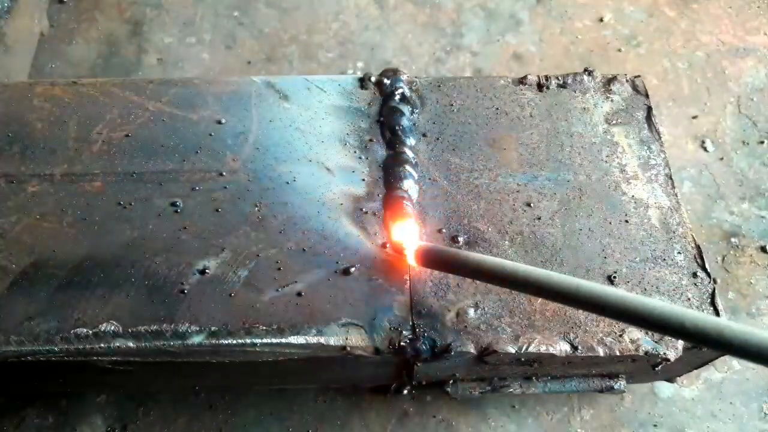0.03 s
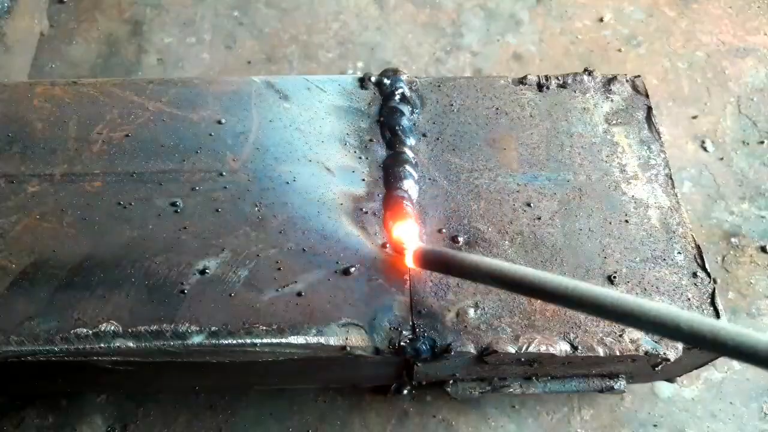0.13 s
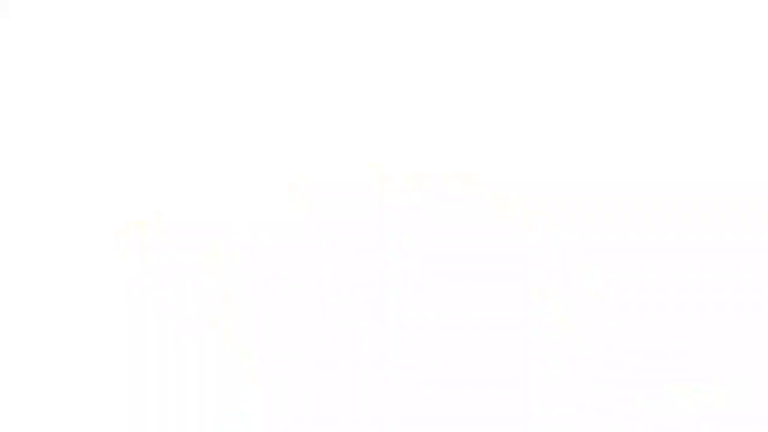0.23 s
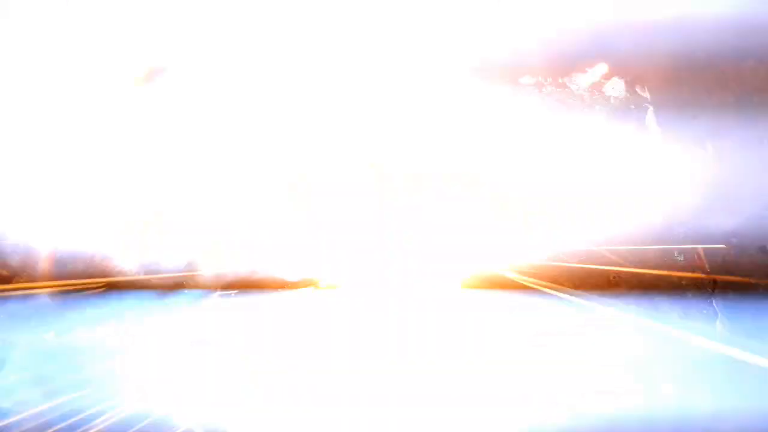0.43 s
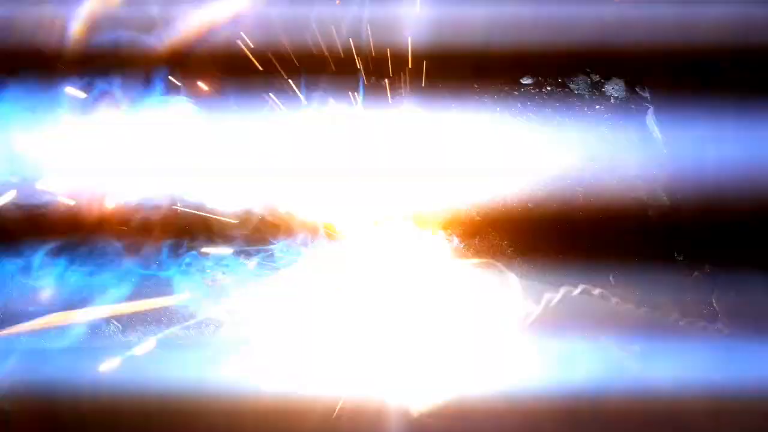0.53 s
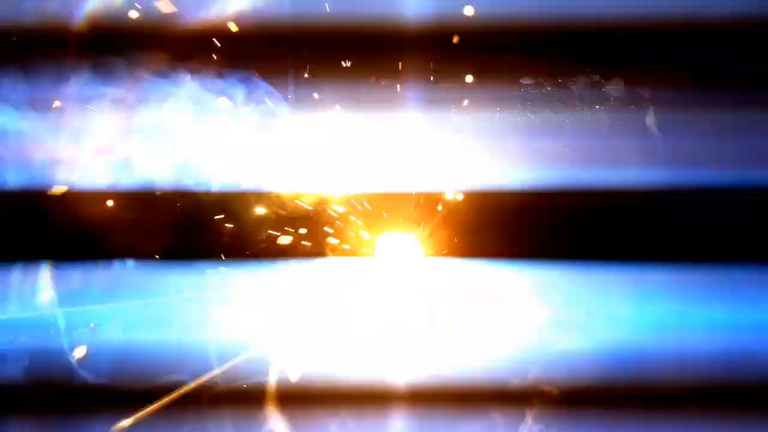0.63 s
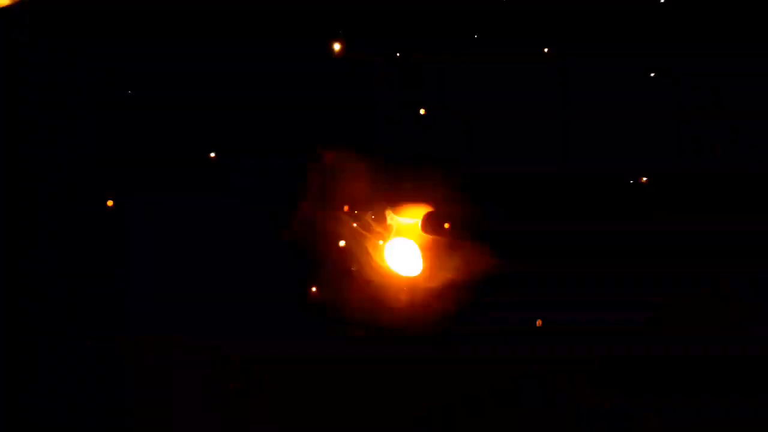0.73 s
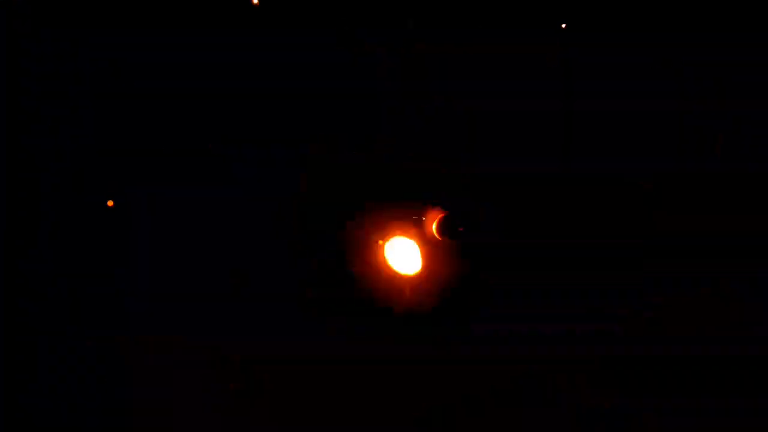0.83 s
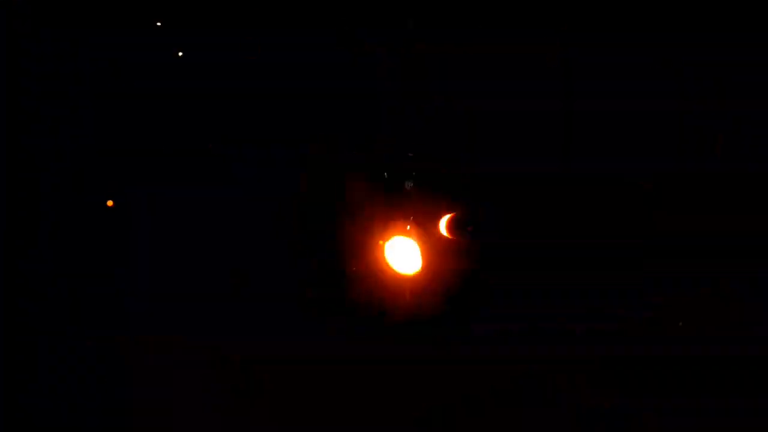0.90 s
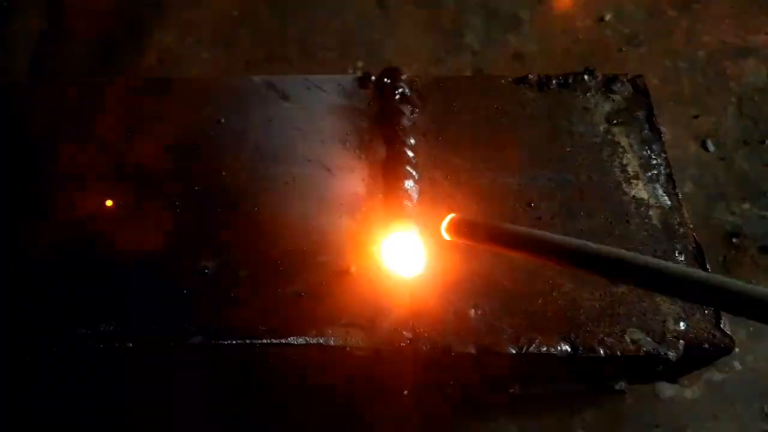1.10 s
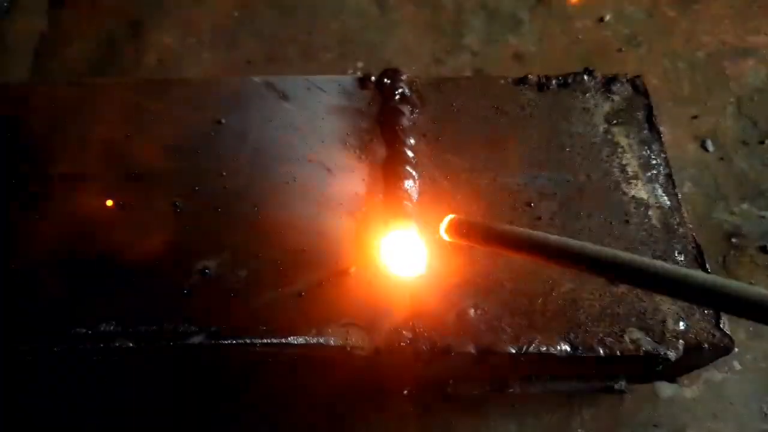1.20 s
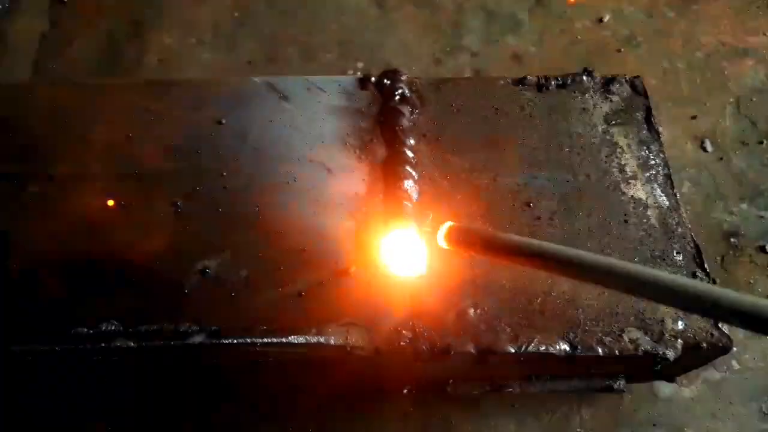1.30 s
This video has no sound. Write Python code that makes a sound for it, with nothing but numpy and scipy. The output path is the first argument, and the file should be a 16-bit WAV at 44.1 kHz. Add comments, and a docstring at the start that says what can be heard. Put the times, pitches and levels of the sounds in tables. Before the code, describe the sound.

A short, harsh crackle of arc welding on steel, followed by a few faint ticks.

```python
"""A half-second tack weld with a stick electrode on a steel section in a workshop.
First low room noise, hum, a dull rumble, a wavering tone and a faint far chirp. At 0.22 s the mains-fed
arc strikes, sizzling in pulses, twice per cycle; sparks burst and the steel rings. Drops of metal short
the arc; it relights each time with a crack and a puff of air. Drawn out with a flutter, it dies at
0.78 s. Spatter ticks on the steel, the cooling weld fizzes, and the chirp comes once more."""
import sys
import numpy as np
from scipy import signal
from scipy.fft import rfft, irfft, next_fast_len
from scipy.io import wavfile
from scipy.ndimage import uniform_filter1d

SR = 44100
rng = np.random.default_rng(int(sys.argv[2]) if len(sys.argv) > 2 else 0)


def wav_record(signal):
    """Record a signal, one row per channel, as 16-bit PCM in the file named by sys.argv[1]."""
    frames = np.transpose(np.atleast_2d(signal))
    bounded = np.clip(frames, -1, 1)
    # unit amplitude maps onto the largest positive 16-bit level
    quanta = np.round(bounded * 32767).astype(np.int16)
    wavfile.write(sys.argv[1], SR, quanta)


N = 59535
TIME = np.arange(N) / SR

# spark bursts: start_s, crack_db, spray_db, spray_ms
SPARKS = [(0.2387, -7, -12, 1.3), (0.2483, -21.5, -15.5, 1.1), (0.2708, -10.5, -33.5, .6),
          (0.3063, -8, -22, 2.2), (0.3111, -13.5, -19, 0.97), (0.3306, -28.5, -17.5, 0.42),
          (0.402, -16, -29.5, 0.43), (0.4256, -21.5, -27.5, 1.0), (0.4277, -14, -14, .8),
          (.4322, -12.5, -38, .5), (0.5003, -6.5, -42.5, .5), (0.5549, -13.5, -39, 0.46),
          (0.564, -4, -21, 1.2), (0.5836, -4.5, -20.5, 0.96), (0.6171, -9.5, -23.5, 0.49),
          (0.646, -32, -40, 0.42), (.7040, -8, -25, .5), (0.733, -10.5, -18, 1.05)]
# relights after a short: start_s, crack_db, spray_db, spray_ms, puff_db, puff_ms, short_ms
POPS = [(0.2578, -27.5, -24.5, 1.6, -19, 0.26, .4), (0.2762, -22.5, -17.5, 2.6, -11.5, 0.091, 0.65),
        (0.2961, -15.5, -23, 4, -19, .15, 0.27), (0.3415, -6, -25, .6, 1, 0.62, 11.3),
        (.3622, -2.5, -12.5, 1.8, -11.5, 0.1, 14), (0.4115, -2, -11, 2.8, -3, 0.43, 7.5),
        (0.4503, -8.5, -10, 1.9, -7.5, .4, 4), (.4801, 4, -26, 0.47, -6.5, 0.22, 8),
        (0.5101, -9.5, -14.5, 3.6, -11, 0.13, 9.1), (0.534, 2.5, -11.5, 3.1, -15.5, 0.65, 6.4),
        (0.5923, -2, -14, 3.3, -24.5, 0.41, 1.6), (0.6548, -5.5, -20, 0.41, -14.5, 0.39, 5.9),
        (0.7085, -8, -23, .6, -1, 0.42, 4)]


def from_db(db):
    """Decibels to gain."""
    return 10 ** (np.asarray(db) / 20)


def rms_one(x):
    """Scale to unit power."""
    return x / np.sqrt(np.mean(x ** 2) + 1e-20)


def level(rows):
    """Gain along a (time_s, level_db) curve, silent outside it."""
    time_s, level_db = np.transpose(rows)
    return from_db(np.interp(TIME, time_s, level_db, left=-140, right=-140))


def colour(x, points):
    """Minimum-phase filter through (freq_hz, gain_db) points."""
    size = 2 * next_fast_len(N)
    freq_hz, gain_db = np.transpose(points)
    grid_hz = np.maximum(np.arange(size // 2 + 1) * SR / size, 1)
    gain = from_db(np.interp(np.log(grid_hz), np.log(freq_hz), gain_db))
    cepstrum = irfft(np.log(gain))
    cepstrum[1:size // 2] *= 2
    cepstrum[size // 2 + 1:] = 0
    return irfft(rfft(x, size) * np.exp(rfft(cepstrum)))[:N]


def high_pass(x, hz):
    """Second-order high-pass."""
    return signal.sosfilt(signal.butter(2, hz, "high", fs=SR, output="sos"), x)


def drift(rate_hz):
    """Smooth random wander, spread about 1."""
    return np.interp(TIME * rate_hz, np.arange(N), rng.standard_normal(N))


def sine(pitch_hz):
    """Unit-power tone along a pitch curve."""
    return np.sqrt(2) * np.sin(2 * np.pi * np.cumsum(pitch_hz) / SR)


def decay(start_s, decay_s):
    """Sudden start, exponential fall."""
    return (TIME >= start_s) * np.exp(-np.maximum(TIME - start_s, 0) / decay_s)


def grains(per_s, spread_db):
    """Random clicks of uneven size, unit power."""
    sizes = from_db(spread_db * np.minimum(rng.exponential(1, N), 3))
    signs = rng.choice([-1, 1], N)
    return rms_one(sizes * signs * (rng.random(N) < per_s / SR))


def ring(x, modes):
    """Damped modes driven by x, alternating in sign."""
    out = 0
    for k, (pitch_hz, gain_db, t60_s) in enumerate(modes):
        radius, angle = np.exp(-np.log(1000) / (t60_s * SR)), 2 * np.pi * pitch_hz / SR
        mode = signal.lfilter([0, np.sin(angle)], [1, -2 * radius * np.cos(angle), radius ** 2], x + 1e-18)
        out += (-1) ** k * from_db(gain_db) * mode
    return out


def reflections(x, delay_s, decay_s):
    """Dense dying cloud of echoes, unit energy."""
    cloud = rng.standard_normal(N) * decay(delay_s, decay_s)
    return signal.fftconvolve(x, cloud / np.sqrt(np.sum(cloud ** 2)))[:N]


def workshop():
    """Low room noise, dipping during the weld, a faint hum and two faint higher tones."""
    # noise envelope: time_s, level_db
    envelope = [(0, -50), (.12, -51), (.2, -48.5), (.3, -63), (.8, -54.5), (.92, -54.5), (1.08, -55),
                (1.2, -57), (1.35, -60)]
    # noise spectrum: freq_hz, gain_db
    spectrum = [(25, -22.5), (52, 1), (105, 2), (240, -7.5), (390, -5), (600, -10.5), (950, -10),
                (1400, -18.5), (1800, -14), (2700, -20.5), (3900, -21.5), (5500, -35), (7600, -25.5),
                (8900, -42.5), (10100, -24), (12000, -45), (15500, -48)]
    # low hum and two faint higher tones: pitch_hz, level_db
    partials = [(53.8, -67), (317.6, -70.5), (414.5, -71.5)]
    noise = rms_one(colour(rng.standard_normal(N), spectrum))
    hum = sum(from_db(db) * sine(hz + 2 * drift(19.95)) for hz, db in partials)
    return noise * level(envelope) + hum


def wavering_tone():
    """A low tone comes and goes before the strike."""
    # tone envelope: time_s, level_db
    envelope = [(0, -50), (.03, -57.5), (.05, -76), (.1, -69), (.125, -45), (.155, -60), (.195, -41.5),
                (.23, -58), (.26, -70)]
    pitch_hz, waver_hz = 403.4, 8
    return level(envelope) * sine(pitch_hz + waver_hz * drift(40))


def rumble():
    """Dull rumble, fading as the arc strikes."""
    # rumble envelope: time_s, level_db
    envelope = [(0, -51.5), (.07, -46.5), (.14, -46.5), (.21, -49.5), (.3, -60)]
    # rumble spectrum: freq_hz, gain_db
    spectrum = [(30, -9), (100, 3), (260, -8.5), (450, -7), (800, -13), (1300, -20.5), (3000, -39.5),
                (15000, -69)]
    return level(envelope) * rms_one(colour(rng.standard_normal(N), spectrum))


def chirps():
    """Two faint, far, falling whistles."""
    # whistles: start_s, level_db
    whistles = [(0.117, -67), (1.178, -69.5)]
    length_s, from_hz, to_hz = .032, 3750, 2950
    out = 0
    for start_s, level_db in whistles:
        progress = np.clip((TIME - start_s) / length_s, 0, 1)
        out += from_db(level_db) * np.sin(np.pi * progress) * sine(from_hz + (to_hz - from_hz) * progress)
    return out


def arc_gain():
    """The arc pulses a little unevenly with the current and drops during each short."""
    pulse_hz, depth_db, scatter_db, short_db = 99.5, 4.2, .6, -31
    peak_s = .2285 + .0007 * drift(pulse_hz)
    pulse = np.cos(2 * np.pi * pulse_hz * (TIME - peak_s))
    gain_db = depth_db * (pulse - .5) + scatter_db * drift(pulse_hz)
    for relight_s, *_, short_ms in POPS:
        gain_db += short_db * ((TIME > relight_s - short_ms / 1000) & (TIME < relight_s))
    return uniform_filter1d(from_db(gain_db), size=40)


def sizzle(burn):
    """Hiss and fine crackle of the burning arc."""
    # arc envelope: time_s, gain_db
    envelope = [(.222, -32), (.227, -30.5), (.24, -27.5), (.275, -31.5), (.32, -31), (.37, -25.5),
                (.43, -29.5), (.49, -26.5), (.55, -34.5), (.61, -31), (.67, -33), (.72, -35.5),
                (.742, -28.5), (.755, -43), (.78, -49)]
    # sizzle spectrum: freq_hz, gain_db
    spectrum = [(100, -22), (380, 0.5), (680, -7), (950, 4), (1150, -4.5), (1500, -10.5), (1830, -2),
                (2600, -4), (4000, 0.5), (5800, -6), (7600, 0), (9100, -7.5), (11000, -2), (15500, -13)]
    fry = rng.standard_normal(N) + from_db(-2.5) * grains(per_s=1100, spread_db=7)
    return colour(fry * level(envelope) * burn, spectrum) * from_db(3)


def flame(burn):
    """Low flutter of the hot gas."""
    # flutter envelope: time_s, gain_db
    envelope = [(.222, -49), (.255, -43), (.28, -38.5), (.32, -36.5), (.38, -38), (.46, -31), (.55, -45),
                (.65, -43.5), (.72, -40.5), (.775, -32.5), (.781, -54)]
    # flutter spectrum: freq_hz, gain_db
    spectrum = [(30, -17.5), (70, 0), (115, 8), (200, -5.5), (380, 5.5), (650, -7.5), (980, -2.5),
                (1500, -13), (4000, -21.5), (15000, -60.5)]
    return rms_one(colour(rng.standard_normal(N), spectrum)) * level(envelope) * np.sqrt(burn)


def steel(arc):
    """The steel section rings under the arc."""
    # section modes: pitch_hz, gain_db, t60_s
    modes = [(362, -57, 0.13), (521.5, -56.5, 0.31), (586, -57, .25), (918, -50, 0.15), (1276, -58.5, 2),
             (1642, -60.5, 1.2), (1815, -36.5, 0.12), (1956, -45, .12), (2334, -46.5, .1),
             (3103, -44.5, 0.079), (3500, -53, 0.043), (3630, -39.5, .08), (8050, -42, .08),
             (7600, -39.5, .05)]
    # further modes at the same two pitches, fainter and dying sooner: pitch_hz, gain_db, t60_s
    extra_modes = [(1276, -63, 1.1), (1642, -66, 1.0)]
    return from_db(-12) * ring(arc, modes + extra_modes)


def room(weld):
    """Workshop reverberation."""
    # echo spectrum: freq_hz, gain_db
    spectrum = [(40, -18), (120, -3), (400, -7), (1000, -3.5), (4000, 3), (8000, 0.5), (15000, -5)]
    t60_s = .44
    echoes = reflections(weld, delay_s=.0055, decay_s=t60_s / np.log(1000))
    return from_db(-18) * colour(echoes, spectrum)


def cracks(events):
    """One tiny bright shock wave per event."""
    # crack spectrum: freq_hz, gain_db
    spectrum = [(100, -32.5), (700, -3), (2000, 7.5), (4500, 5.5), (8000, 6.5), (12000, 6.5), (15500, 1)]
    clicks = np.zeros(N)
    for start_s, crack_db, *_ in events:
        clicks[int(start_s * SR)] += from_db(crack_db)
    return colour(clicks, spectrum)


def sprays():
    """A spit of metal vapour after each spark and pop."""
    # spray spectrum: freq_hz, gain_db
    spectrum = [(100, -2.5), (400, 1), (950, 5.5), (1400, -3.5), (1850, 9), (2700, -1), (4000, 4),
                (5800, -6.5), (7600, 6), (9100, -10.5), (11000, -2.5), (15500, 0)]
    bursts = sum(from_db(spray_db) * decay(start_s, spray_ms / 1000)
                 for start_s, _, spray_db, spray_ms, *_ in POPS + SPARKS)
    return colour(bursts * rng.standard_normal(N), spectrum)


def puffs():
    """Gas expands at each relight: a sharp pressure pulse, then a slower swell."""
    swell_re_spray_db, swell_s = -10, .0023
    pressure = 0
    for start_s, _, spray_db, _, puff_db, puff_ms, _ in POPS:
        age_s = np.maximum(TIME - start_s, 0)
        progress = age_s * 1000 / puff_ms
        pulse = from_db(puff_db) * np.sqrt(progress) * np.exp((1 - progress) / 2)
        swell = from_db(spray_db + swell_re_spray_db) * age_s / swell_s * np.exp(1 - age_s / swell_s)
        pressure -= pulse + swell
    return high_pass(high_pass(pressure, hz=82), hz=50)  # the bass swings back


def cooling():
    """The cooling weld fizzes ever more faintly."""
    arc_out_s, start_db, fade_db_per_s = .78, -60, 41.5
    fade = (TIME > arc_out_s) * from_db(start_db - fade_db_per_s * (TIME - arc_out_s))
    return high_pass(fade * grains(per_s=2300, spread_db=5), hz=2610)


def spatter():
    """Beads of metal land and tinkle."""
    # landings: start_s, crack_db
    landings = [(.900, -60), (.935, -54), (.940, -40.5), (0.975, -48), (1.028, -59), (1.037, -54),
                (1.071, -45), (1.077, -45), (1.123, -52), (1.251, -58)]
    # tinkle modes: pitch_hz, gain_db, t60_s
    modes = [(8700, -19.5, 0.011), (9800, -24, 0.02), (10900, -28, 0.036), (12350, -24, 0.031),
             (14000, -26, 0.039)]
    ticks = cracks(landings)
    return ticks + ring(ticks, modes)


def scene():
    """The weld close by, its echoes off bench and room, and the background."""
    burn = arc_gain()
    arc = sizzle(burn) + sprays() + cracks(POPS + SPARKS)
    bench = from_db(-10.5) * reflections(arc, delay_s=.0015, decay_s=.0013)
    weld = arc + steel(arc) + bench + flame(burn) + puffs() + cooling() + spatter()
    return (weld + room(weld) + workshop() + wavering_tone() + rumble() + chirps())[None]


def record(dry):
    """Band-limited microphone; the loudest peaks overload it and are rounded."""
    cutoff_hz, ceiling = 15700, .88
    heard = signal.sosfilt(signal.cheby1(10, .2, cutoff_hz, fs=SR, output="sos"), dry)
    rounded = heard / (1 + (heard / ceiling) ** 6) ** (1 / 6)
    return signal.sosfilt(signal.butter(8, cutoff_hz + 600, fs=SR, output="sos"), rounded)


dry = scene()
out = record(dry)
wav_record(out)
```